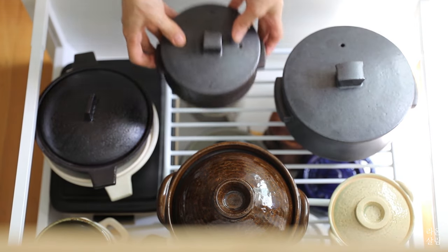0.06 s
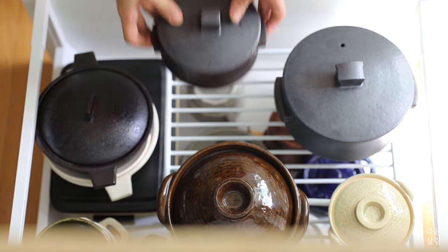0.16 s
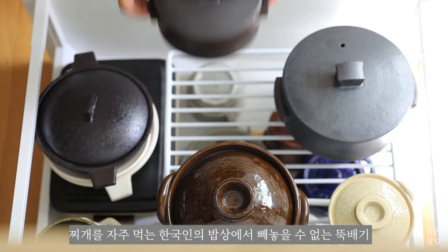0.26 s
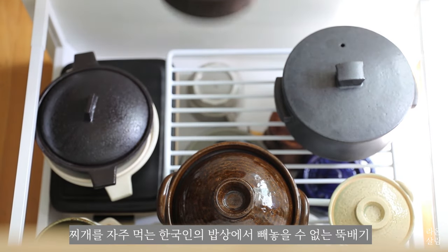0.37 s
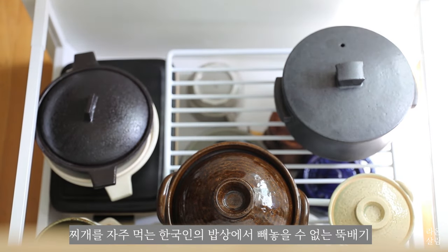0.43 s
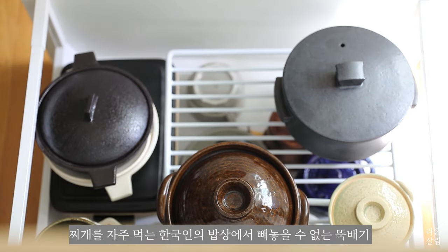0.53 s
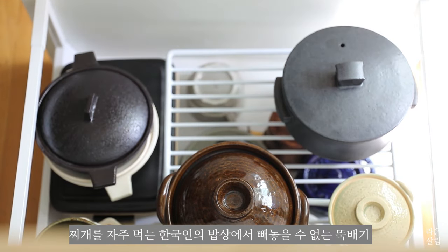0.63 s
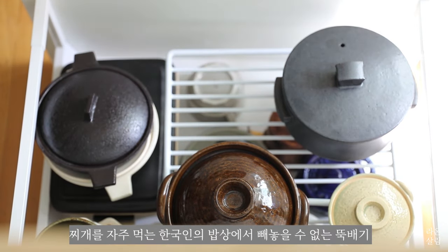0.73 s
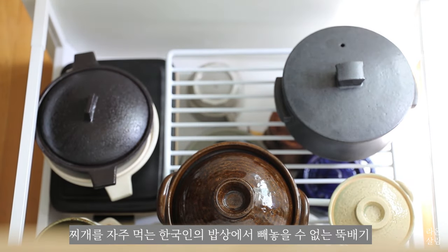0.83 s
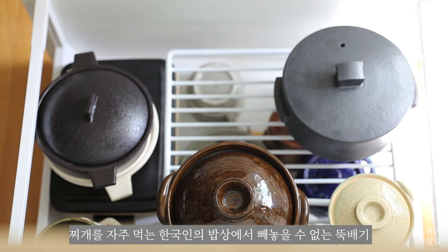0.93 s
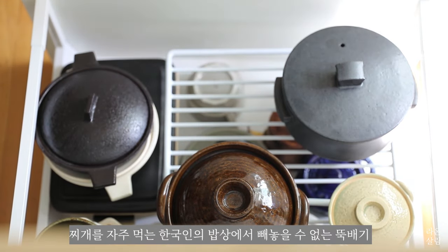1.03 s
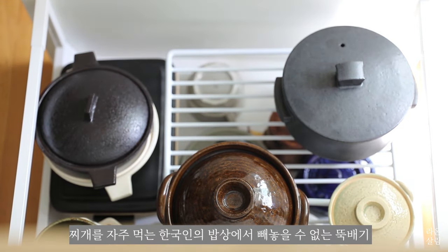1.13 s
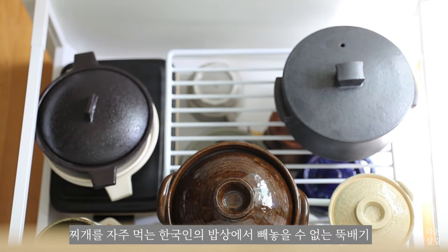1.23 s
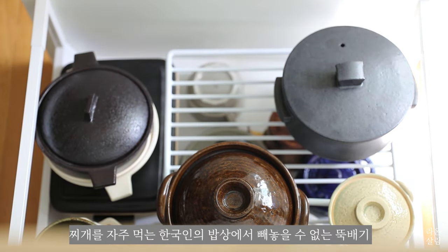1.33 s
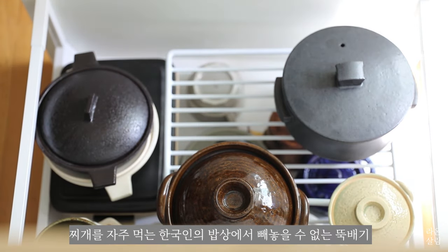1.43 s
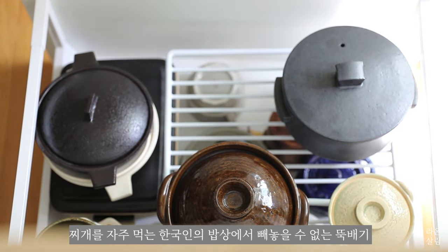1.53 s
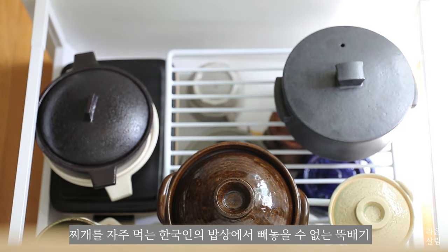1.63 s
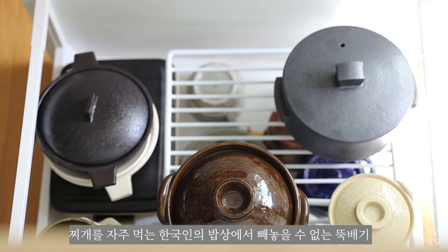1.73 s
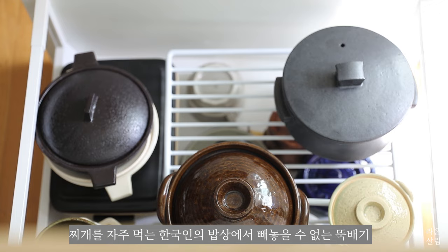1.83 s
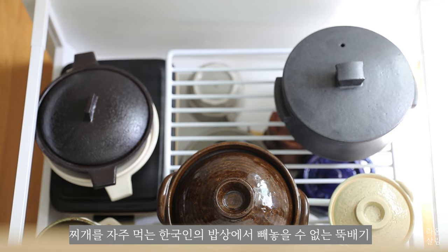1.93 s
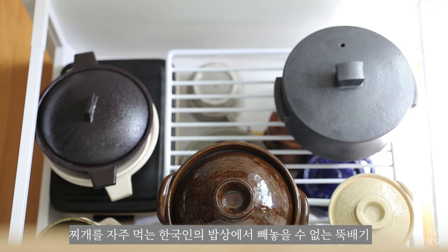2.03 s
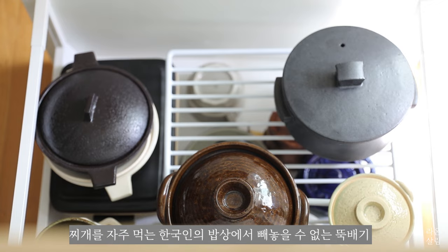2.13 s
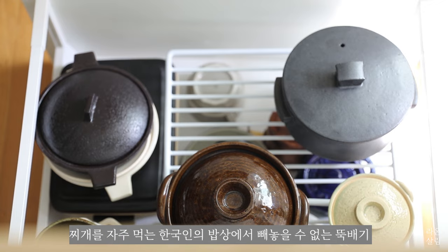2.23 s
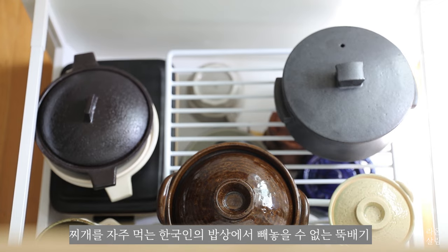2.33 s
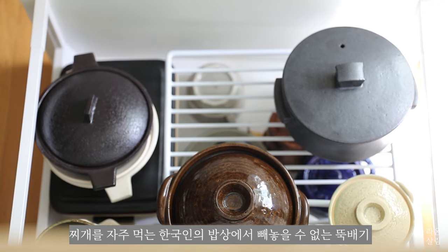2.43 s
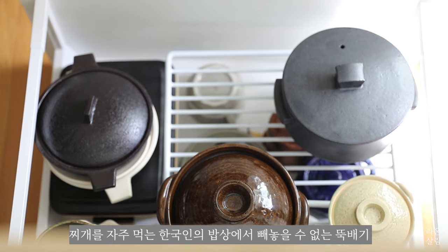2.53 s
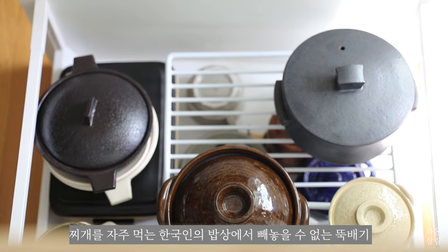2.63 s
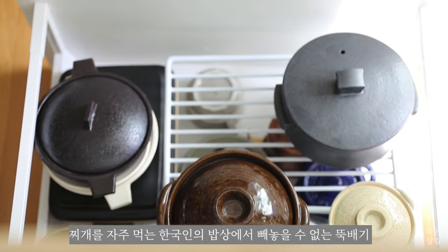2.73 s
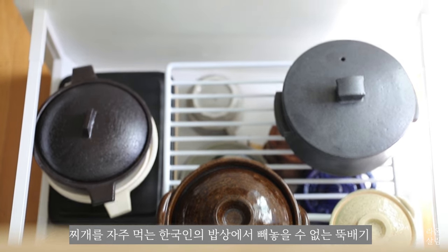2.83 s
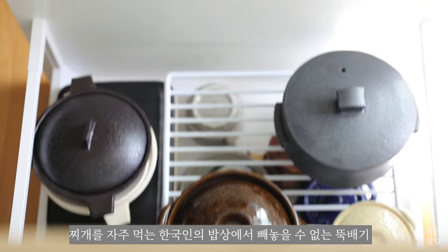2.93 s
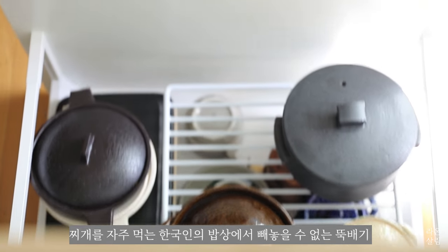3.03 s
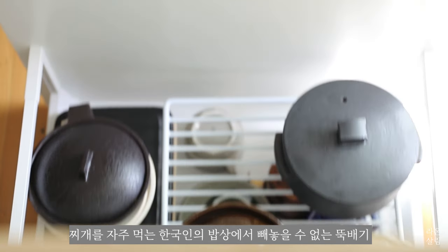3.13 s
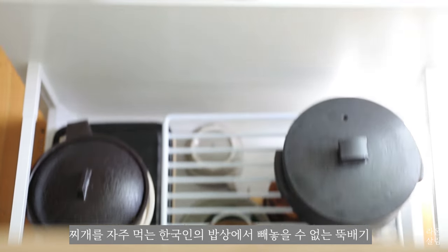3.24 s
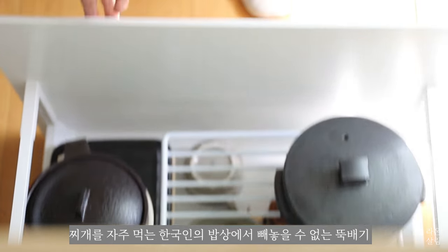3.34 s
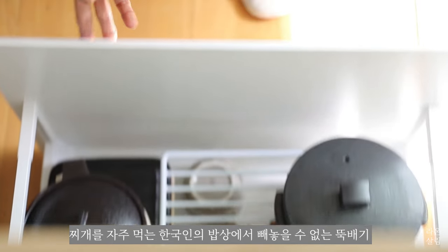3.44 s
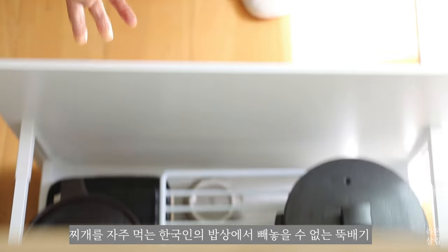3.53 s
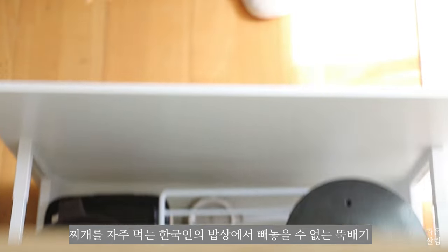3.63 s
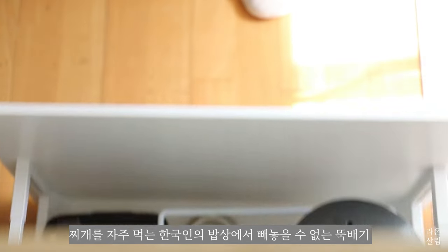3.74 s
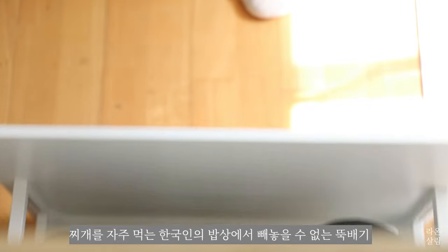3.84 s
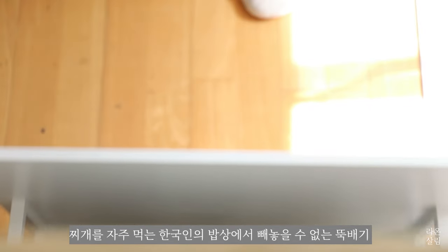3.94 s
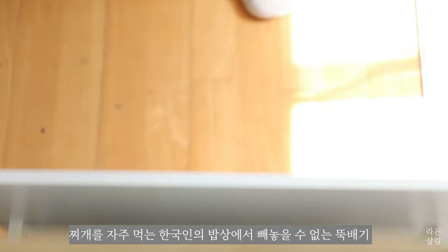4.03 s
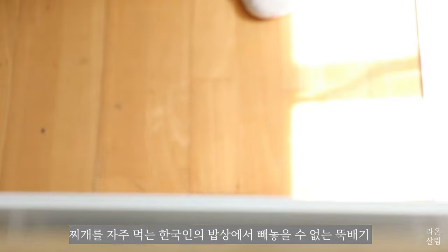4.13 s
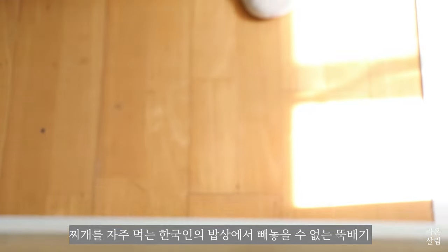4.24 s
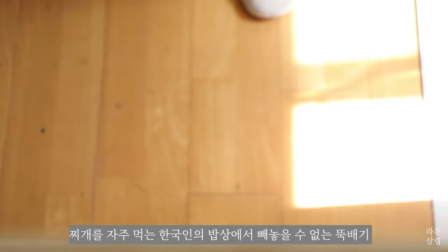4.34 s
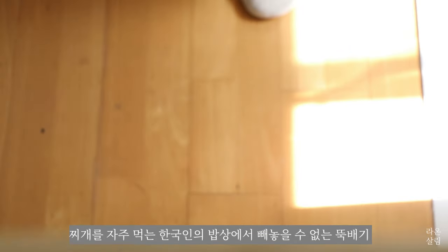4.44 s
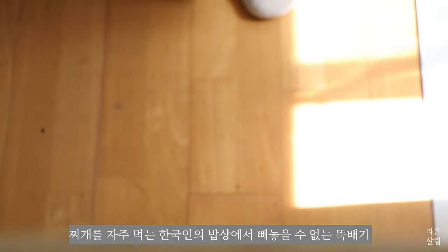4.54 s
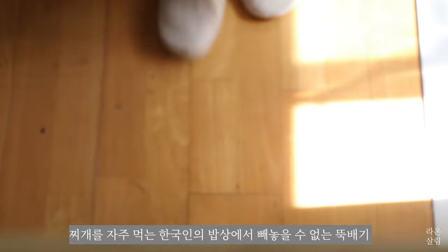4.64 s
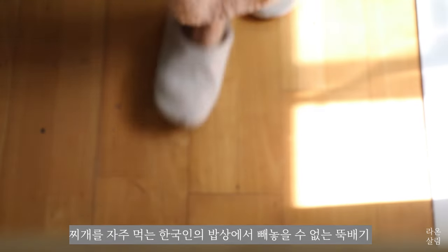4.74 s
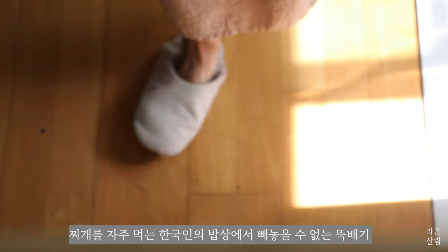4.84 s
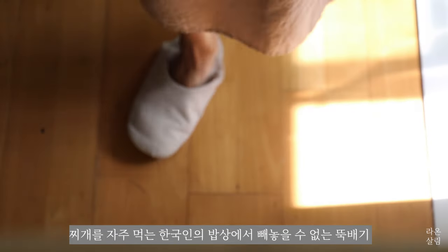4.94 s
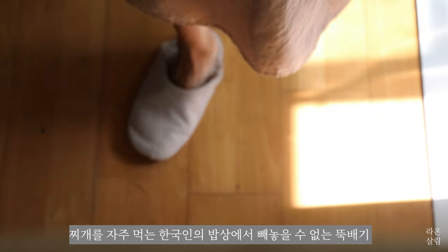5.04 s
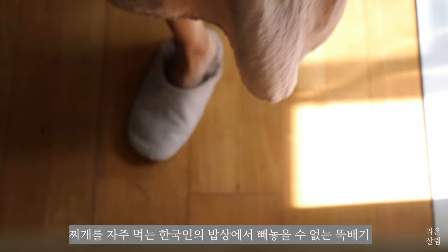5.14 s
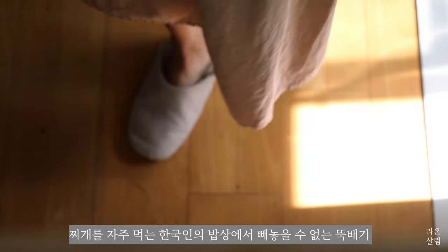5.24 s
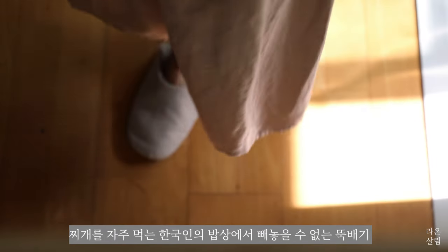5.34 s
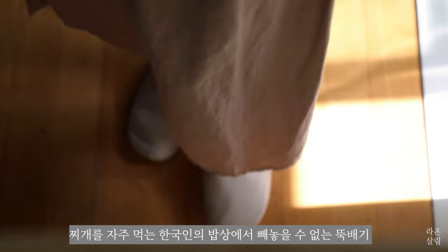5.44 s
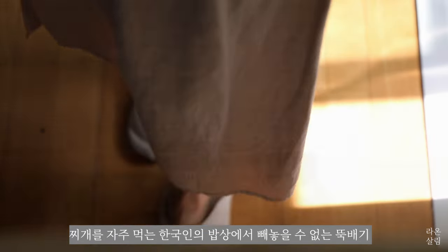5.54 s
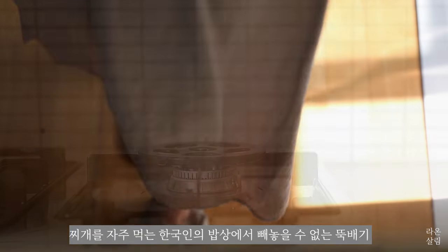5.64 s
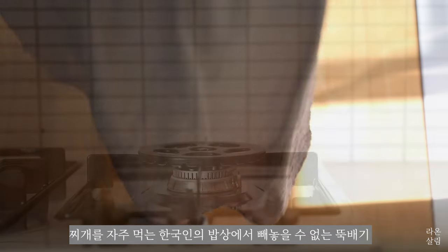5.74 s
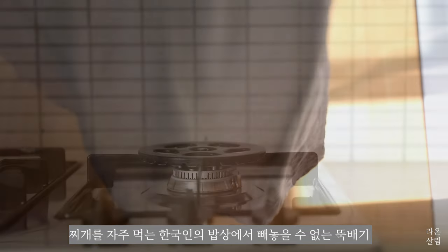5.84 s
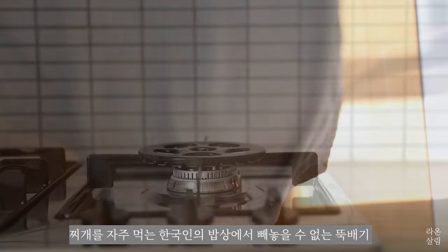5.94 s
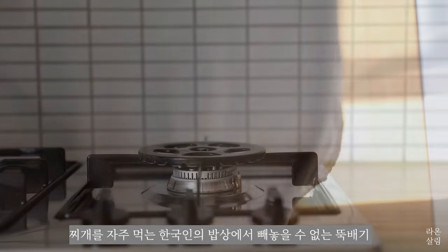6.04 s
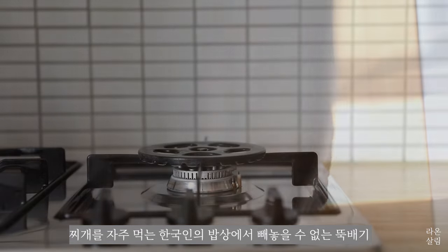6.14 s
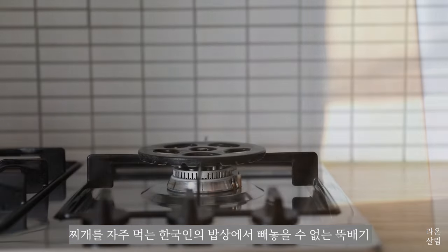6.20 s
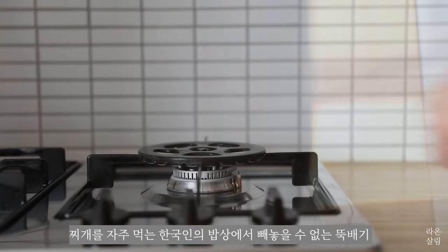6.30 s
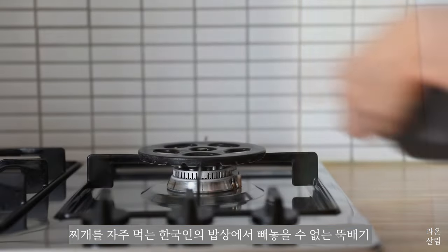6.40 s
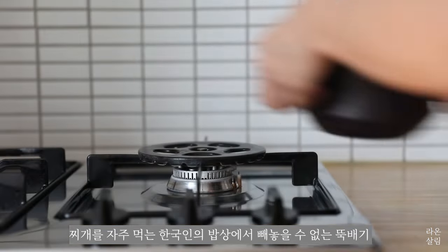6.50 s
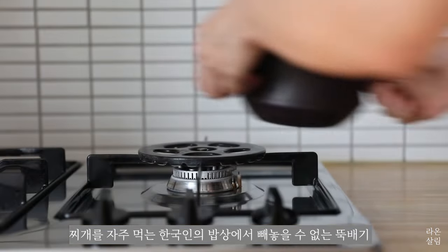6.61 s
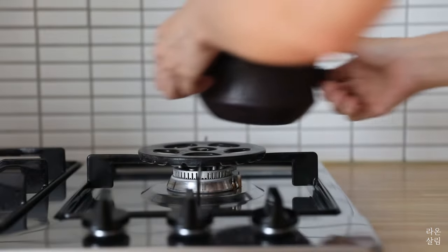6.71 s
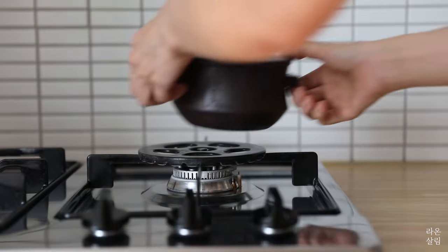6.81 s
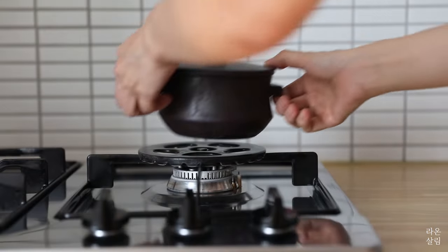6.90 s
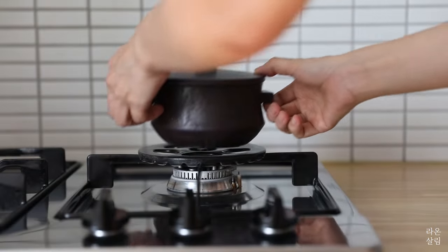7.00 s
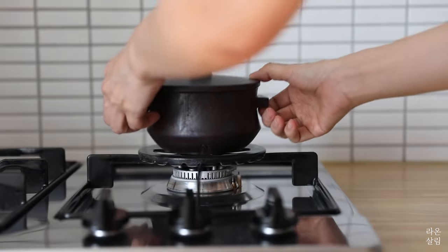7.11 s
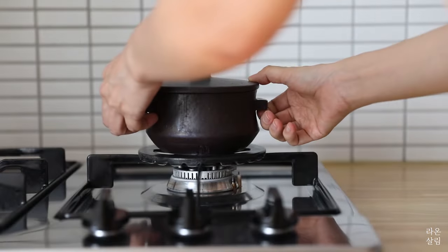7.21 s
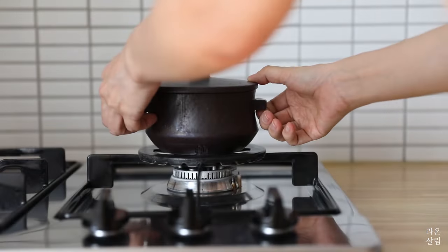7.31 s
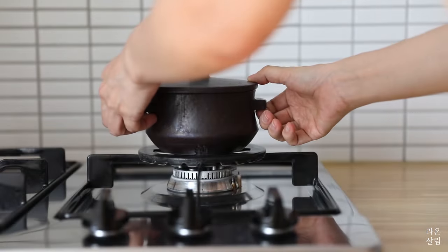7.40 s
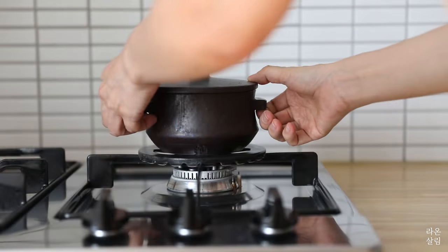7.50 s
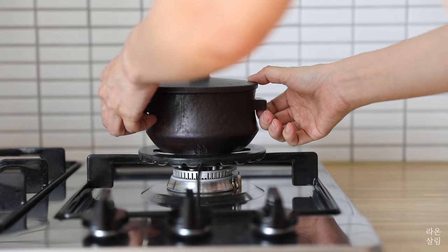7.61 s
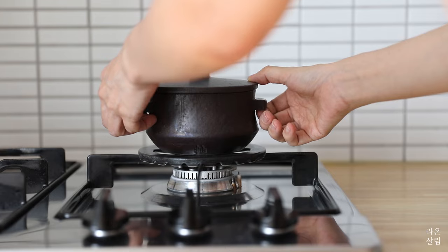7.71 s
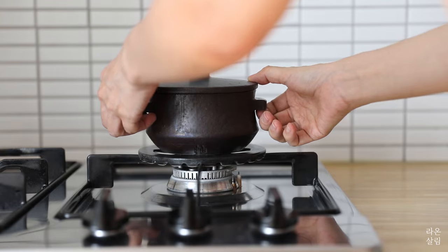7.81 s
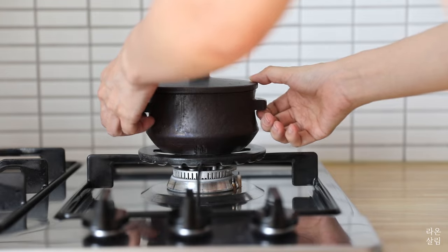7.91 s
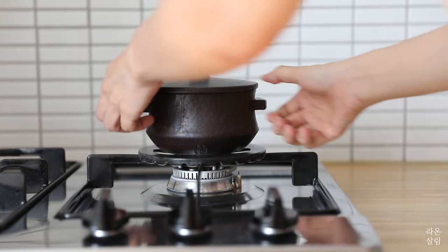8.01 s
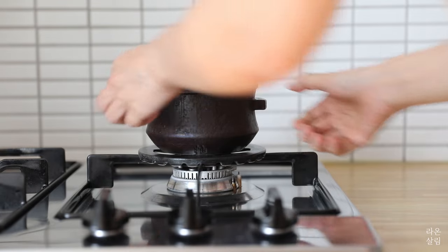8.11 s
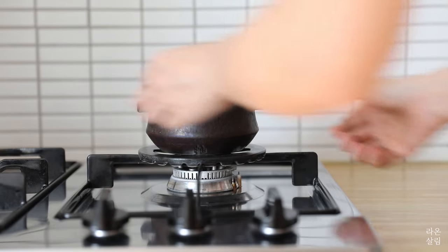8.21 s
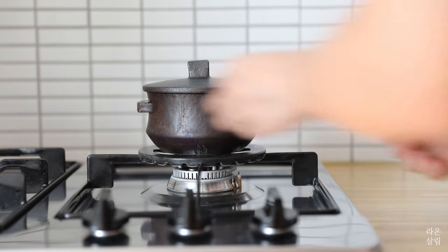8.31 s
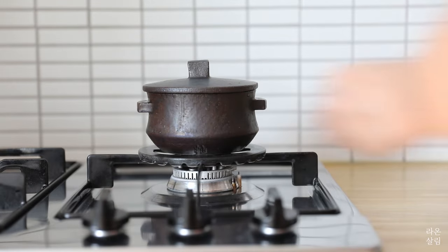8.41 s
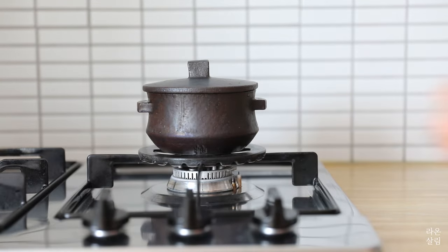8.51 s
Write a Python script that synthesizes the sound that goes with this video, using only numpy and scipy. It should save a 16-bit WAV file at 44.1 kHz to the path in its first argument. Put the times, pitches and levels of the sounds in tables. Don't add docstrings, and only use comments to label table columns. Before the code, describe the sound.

A small hard kitchen with short bright echoes, low room hum and slight hiss, one fixed microphone. Clothes rustle softly from the start; at 1.1 s a clay lid gives one sharp, dry clink. Around 1.5 s a thin wooden panel knocks in a quick flutter, and slippers step at 2.05 and 2.4 s. From 2.9 s a loaded wooden drawer rolls with a low, uneven rumble; pots shift at 3.6 s. Rapid catch knocks and a tiny squeak begin at 4.1 s, leading to a loud slam at 4.75 s with clanking earthenware, another bang at 4.85 s and a deep thud at 4.95 s. Scraping and weakening rocking bumps fade by 5.9 s. A cupboard door knocks lightly at 6.1-6.3 s. At 7.26 s a lidded pot lands hard on an iron grate, bounces until 7.35 s, wobbles and rings briefly. Cloth rustles and a faint bump end it.

```python
import sys
import numpy as np
from scipy import signal
from scipy.fft import rfft, irfft, next_fast_len
from scipy.io import wavfile
from scipy.ndimage import uniform_filter1d

SR = 44100
rng = np.random.default_rng(int(sys.argv[2]) if len(sys.argv) > 2 else 0)


def to_wav(sig):
    pcm = np.clip(np.atleast_2d(sig), -1, 1) * 32767
    pcm = np.round(pcm).astype(np.int16)
    wavfile.write(sys.argv[1], SR, pcm.T)


def to_linear_factor(level_db):
    exponent = np.asarray(level_db, float) / 20
    return 10 ** exponent


N = 377493

# (time [s], rolling level [dB])
ROLL = [(2.85, -60), (2.98, -46.5), (3.26, -42.5), (3.33, -42), (3.45, -40), (3.56, -41.5), (3.76, -44),
        (3.94, -41), (4.08, -40.5), (4.14, -34), (4.29, -44), (4.5, -42.5), (4.68, -44), (5.34, -49.5),
        (5.9, -66), (6.05, -82)]
# (frequency [Hz], width [Hz], level [dB])
DRAWER = [(76.5, 84, -2), (142.7, 72, 4), (247, 90, 0), (361, 66, 4), (474.4, 58, 2.5), (566, 190, -0.5),
          (797, 76, -5)]
# (frequency [Hz], width [Hz], level [dB])
LOAD = [(940, 1120, 18.5), (1560, 1200, -22), (1940, 750, -1), (2680, 530, -2), (3570, 470, 2.5)]
# (time [s], hold [s], rumble [dB], rattle [dB])
JOLTS = [
    (3.616, 0.038, -39, -57),
    (4.764, 0.051, -25.5, -32.5),
    (4.85, 0.023, -46, -32),
    (4.96, 0.03, -33, -56),
    (4.994, 0.0234, -45, -45),
    (5.106, 0.0184, -48, -43),
]
# (time [s], hold [s], level [dB])
SCRAPES = [
    (4.72, .01, -44),
    (5.22, 0.09, -35),
    (6.05, .01, -48),
]
# (time [s], hold [s], level [dB])
BRUSH = [(2.17, 0.03, -55), (5.218, 0.0057, -48), (6.925, 0.008, -53), (4.115, 0.051, -49.5),
         (4.535, 0.01, -48), (4.57, 0.02, -46), (4.7, 0.015, -48), (4.775, 0.015, -42), (4.87, 0.02, -56),
         (5.28, 0.018, -42.5), (8.21, 0.022, -51)]
# (time [s], hold [s], level [dB])
SLAPS = [
    (4.533, .006, -54),
    (4.566, .018, -53),
    (4.688, .016, -50),
    (4.729, .002, -47),
    (4.7605, .016, -41),
    (5.2185, .002, -46),
]

# (time [s], peak level [dB], contact [ms])
LATCH = [(s, db, .45) for s, db in [(4.1, -23.5), (4.125, -21.5), (4.149, -26.5), (4.18, -35), (4.225, -26),
         (4.247, -21), (4.301, -29), (4.33, -25), (4.373, -24), (4.401, -29), (4.434, -28.5), (4.468, -25),
         (4.489, -26.5), (4.529, -26), (4.6, -27), (4.65, -33)]]
# (time [s], peak level [dB], contact [ms])
SHUT = [(4.688, -25.5, 0.52), (4.724, -12.5, 0.2), (4.746, -9, 0.5), (4.7478, -4, 0.21), (4.764, -14, 0.3),
        (4.775, -11.5, 0.18), (4.785, -15, 0.19), (4.81, -22, 0.38), (4.847, -12.5, 0.25),
        (4.862, -11.5, 0.2), (4.885, -13.5, 0.32), (4.905, -19, 0.23), (4.985, -14, 0.22),
        (5.107, -25, 0.25), (5.125, -22.5, 0.16)]
# (time [s], peak level [dB], contact [ms])
THUD = [
    (4.951, -1, 1.3),
    (4.968, -8, 0.95),
    (4.988, -15, 1),
]
# (time [s], peak level [dB], contact [ms])
BOOM = [(4.985, -11, 3.3)]
# (time [s], peak level [dB], contact [ms])
ROCK = [(s, db, .8) for s, db in [(5.069, -19), (5.219, -25), (5.347, -28.5), (5.401, -36), (5.464, -33),
        (5.525, -30), (5.577, -37), (5.631, -32), (5.68, -42), (5.728, -34), (5.78, -36), (5.828, -33),
        (5.89, -38)]]
# (time [s], peak level [dB], contact [ms])
RACK = [(5.22, -30.5, 0.32), (5.347, -31, 0.36), (5.39, -45, .4), (5.463, -36, 0.34), (5.514, -40, .4),
        (5.545, -37.5, .4), (5.575, -40, 0.54), (5.622, -39.5, 0.49), (5.672, -45, .4), (5.712, -47, 0.45),
        (5.75, -46, 0.32), (5.826, -41, 0.46), (5.87, -54, .4)]
# (time [s], peak level [dB], contact [ms])
SQUEAK = [
    (4.112, -39, .03),
    (4.13, -33.5, 0.034),
    (4.15, -38, .03),
    (4.172, -44, .02),
]
# (time [s], peak level [dB], contact [ms])
POTS = [
    (3.725, -53, .11),
    (4.8604, -9, 0.096),
    (4.872, -19.5, 0.087),
    (4.912, -20, 0.095),
]
# (time [s], peak level [dB], contact [ms])
NUDGE = [
    (4.114, -29.5, 0.055),
    (4.241, -35, .05),
    (4.7655, -15, 0.16),
    (4.7997, -26, 0.097),
    (4.9144, -29, 0.12),
    (5.0191, -36, 0.12),
]
# (time [s], peak level [dB], contact [ms])
JUG = [
    (3.6114, -34.5, 0.23),
    (4.78, -13, 0.22),
    (4.847, -17.5, 0.25),
    (4.9911, -14, 0.19),
    (5.005, -19.5, 0.23),
    (5.244, -29.5, 0.34),
]
# (time [s], peak level [dB], contact [ms])
BOWL = [
    (4.729, -20.5, 0.11),
    (4.8, -23.5, .12),
]
# (time [s], peak level [dB], contact [ms])
CUP = [(6.413, -43.5, 0.13)]
# (time [s], peak level [dB], contact [ms])
CHINK = [(4.996, -40, 0.025)]
# (time [s], peak level [dB], contact [ms])
GRATE = [
    (7.2612, -2.5, 0.016),
    (7.2642, 0, 0.012),
    (7.2795, -10, 0.022),
    (7.2855, -2, 0.04),
    (7.344, -18, .04),
    (7.349, -5.5, 0.052),
]
# (time [s], peak level [dB], contact [ms])
BARS = [
    (7.2635, -15, 0.011),
    (7.281, -21, .015),
    (7.3465, -20, 0.015),
]
# (time [s], peak level [dB], contact [ms])
WOBBLE = [
    (7.297, -15.5, 0.055),
    (7.358, -16, 0.099),
    (7.388, -21, 0.079),
    (7.418, -18.5, 0.3),
    (7.44, -20, 0.36),
    (7.468, -22, 0.42),
]
# (time [s], peak level [dB], contact [ms])
STOVE = [
    (7.264, -17, 1.0),
    (7.346, -17.5, 1.4),
    (7.42, -27, 1.5),
    (8.43, -40.5, 7.1),
]
# (time [s], peak level [dB], contact [ms])
LID = [
    (.978, -38, .05),
    (1.0748, -15, 0.045),
    (1.0782, -21, .15),
]
# (time [s], peak level [dB], contact [ms])
PANEL = [
    (1.457, -26, 0.12),
    (1.4685, -26, 0.1),
    (1.476, -24, 0.12),
    (1.499, -29, 0.2),
    (1.513, -31, .8),
    (1.527, -29, 1),
    (1.546, -34, 1.2),
]
# (time [s], peak level [dB], contact [ms])
DOOR = [(s, db, .45) for s, db in [(6.073, -24), (6.101, -28), (6.184, -32), (6.301, -36.5), (6.329, -37)]]
# (time [s], peak level [dB], contact [ms])
STEPS = [
    (1.995, -36, 0.5),
    (2.039, -27, 0.187),
    (2.0645, -21, 0.3),
    (2.084, -29.5, 0.52),
    (2.104, -33, 0.25),
]
# (time [s], peak level [dB], contact [ms])
HEEL = [
    (2.342, -34.5, 0.72),
    (2.3865, -20, .3),
    (2.404, -27, 0.35),
]
# (time [s], peak level [dB], contact [ms])
TICKS = [(s, db, .045) for s, db in [(4.0966, -39), (4.2392, -39), (5.2183, -31.5), (5.295, -28),
         (5.548, -43), (6.929, -40)]]
# (time [s], peak level [dB], contact [ms])
RUBS = [(s, db, .07) for s, db in [(4.1111, -31), (4.76, -24), (6.0843, -39.5)]]
# (time [s], peak level [dB], contact [ms])
SNAPS = [
    (1.0748, -45, 0.041),
    (1.4555, -39.5, .04),
    (1.994, -36.5, .04),
    (2.0385, -34, .04),
    (2.062, -31, .04),
    (2.3405, -38, .04),
    (2.3845, -31.5, .04),
    (4.148, -38, .08),
    (4.586, -32, .06),
    (4.688, -36, .05),
]
# (time [s], peak level [dB], contact [ms])
TAPS = [
    (5.4265, -39.5, 0.1),
    (5.513, -44, 0.087),
    (5.527, -38.5, 0.055),
    (5.6518, -34, .05),
    (5.664, -34, 0.073),
    (5.829, -39, 0.041),
    (6.413, -43, 0.13),
]

# (frequency [Hz], level [dB], t60 [s])
SHUT_MODES = [(156, -28, 0.26), (205, 1.5, 0.16), (265, -12, 0.11), (369, 11.5, 0.034), (453, 1, 0.18),
              (604, -1.5, 0.051), (656, 13.5, 0.052), (742, 14.5, 0.12), (817, 11, 0.079),
              (1030, -26, 0.099), (1464, 4, 0.035)]
# (frequency [Hz], level [dB], t60 [s])
THUD_MODES = [(50, -14, 0.55), (63.4, 4.5, 0.38), (126.4, -4, 0.28), (145, 13, 0.14), (200, 9.5, 0.076),
              (245, -6, 0.055)]
# (frequency [Hz], level [dB], t60 [s])
BOOM_MODES = [(64, 4, 0.4), (74.5, -6, .6)]
# (frequency [Hz], level [dB], t60 [s])
ROCK_MODES = [(72, -5, .2), (149.7, 6.5, 0.079), (253.5, -11, 0.063)]
# (frequency [Hz], level [dB], t60 [s])
RACK_MODES = [(454.6, -3, 0.28), (900, -10, .05)]
# (frequency [Hz], level [dB], t60 [s])
SQUEAK_MODES = [(2500, -1, .02), (3000, -5, .02), (3480, -2, .02), (3720, 1, 0.027), (3980, -1, .025),
                (4200, -4, .02), (5230, -1, 0.06), (5340, -13, .03)]
# (frequency [Hz], level [dB], t60 [s])
POT_MODES = [(911, -4, 0.042), (1955, -10.5, 0.05), (3038, 3, 0.03), (3393, -5, 0.024), (2650, -6, 0.032),
             (4260, -20, 0.032), (5340, -18, 0.027), (6700, -16, 0.027)]
# (frequency [Hz], level [dB], t60 [s])
JUG_MODES = [(920, 1, 0.069), (1004, -2, 0.035), (1360, -5, 0.057), (1973, -3, 0.036), (2890, -9, .03),
             (4430, -18, .03)]
# (frequency [Hz], level [dB], t60 [s])
BOWL_MODES = [(1030, -6, .03), (2655, 3.5, 0.027), (3170, -5, 0.027), (3800, -10, .03)]
# (frequency [Hz], level [dB], t60 [s])
CUP_MODES = [(1037, 0, 0.04), (1720, -2, 0.045)]
# (frequency [Hz], level [dB], t60 [s])
CHINK_MODES = [(3940, 0.5, 0.95), (5425, 4, 0.099), (6250, -2, .05), (6980, 0, 0.05), (10780, -10, .03)]
# (frequency [Hz], level [dB], t60 [s])
GRATE_MODES = [(409, -29, 0.43), (612, -23, .2), (700, -2, 0.06), (880, 1, 0.08), (1258, -13, 0.18),
               (1400, -6, 0.046), (1970, -28, 0.14), (2780, -6.5, .08), (2950, -19, 0.16), (3530, -5, 0.12),
               (3670, -6, 0.196), (3712, 0, 0.13), (4370, -20.5, 0.098), (4950, -16, 0.155)]
# (frequency [Hz], level [dB], t60 [s])
BAR_MODES = [(5450, -14, 0.207), (5810, -16, 0.172), (6100, -3.5, 0.067), (6200, 1, 0.041),
             (7410, -1, 0.08), (8460, 1.5, 0.038), (9440, -17, .05), (10400, -11, 0.05), (11330, -15, .11),
             (13250, -33.5, .12), (14750, -19, .12)]
# (frequency [Hz], level [dB], t60 [s])
LONG_BAR_MODES = [(2616, -3, .3), (3020, -2, .27), (3560, -3, .4), (3640, -4, 0.33), (3750, -6, .42),
                  (3830, -6, .3), (5780, -5, .3), (7375, -12, 0.36), (7440, -14, .3), (8460, -7.5, 0.36),
                  (10250, -9, 0.17), (11210, -13, 0.12), (13100, -17, .12), (14400, -16, .1)]
# (frequency [Hz], level [dB], t60 [s])
STOVE_MODES = [(90.8, 1, 0.48), (128, 3, 0.51), (158.7, -5.5, 0.45), (219.5, 4.5, 0.307),
               (282.6, 2.5, 0.48)]
# (frequency [Hz], level [dB], t60 [s])
LID_MODES = [(656, -13.5, 0.04), (812, -2, 0.05), (880, 2, 0.035), (1100, -13, .02), (905, -11, .2),
             (1480, -12, 0.012), (2030, -13, 0.08), (2998, -4, .018), (3740, -7, .015), (4250, -11, .012)]
# (frequency [Hz], level [dB], t60 [s])
PANEL_MODES = [(154, -19, .1), (257, 1.5, 0.2), (286.3, 5, 0.2), (330, -5, 0.12), (650, -9, .05),
               (950, -5, .05), (1130, -1, .07), (1500, -4, .045), (2000, -8, .04), (2800, -9, .04)]
# (frequency [Hz], level [dB], t60 [s])
DOOR_MODES = [(303, 13, 0.15), (318, -4, 0.14), (354, 1, 0.1), (990, -26, .05)]
# (frequency [Hz], level [dB], t60 [s])
STEP_MODES = [(160, -1, .08), (244, -6, 0.055), (314, -5, 0.061), (413, -5, .07), (590, -7, 0.044),
              (756, -12, .04), (1800, -12, .02)]
# (frequency [Hz], level [dB], t60 [s])
HEEL_MODES = [(153, -6, 0.12), (270, -3, 0.13), (506, -4.5, .08), (842, -1.5, 0.066), (1310, -7, .03),
              (1780, -22, .02)]
# (frequency [Hz], level [dB], t60 [s])
TICK_MODES = [(2110, -10, 0.0096), (3760, 25, 0.0074), (4960, -25, 0.0081), (7500, -31, .01),
              (11000, -17, .01)]
# (frequency [Hz], level [dB], t60 [s])
TAP_MODES = [(1370, -4, .025), (2070, -4, 0.018), (3600, -4, 0.013)]

# (frequency [Hz], level [dB per Hz])
SHUT_CLATTER = [(35, -58), (105, -25), (157, 3), (582, -2.5), (729, -8.5), (825, -55), (1050, -12.5),
                (8000, -48), (10400, -49), (17600, -120)]
# (frequency [Hz], level [dB per Hz])
LOW_CLATTER = [(24, -38), (40, -24), (182, 8), (484, -33), (979, -14), (3000, -40), (3900, -76.5)]
# (frequency [Hz], level [dB per Hz])
POT_CLATTER = [(470, -21), (800, 0.5), (1740, -15), (2010, -8.5), (2290, -22), (3210, -17.5), (4710, -25),
               (9000, -57)]
# (frequency [Hz], level [dB per Hz])
GRATE_CLATTER = [(76, -40), (130, 2), (210, 1), (400, -13), (712, -2), (1060, -4), (2510, -6), (3750, -6.5),
                 (6690, -17), (8680, -17), (15500, -39.5)]
# (frequency [Hz], level [dB per Hz])
WOBBLE_CLATTER = [(76, -30), (130, -2), (400, 4.5), (1400, -8), (2800, -6.5), (3750, -15), (5800, -24),
                  (8000, -40)]
# (frequency [Hz], level [dB per Hz])
LID_CLATTER = [(300, -40), (500, -14), (850, 0), (1250, -10), (1500, -17), (2930, -21), (4200, -26),
               (5000, -50)]
# (frequency [Hz], level [dB per Hz])
PANEL_CLATTER = [(88, -39), (150, -22), (305, -7.5), (660, -18), (1100, -13), (2380, -33.5), (6000, -48),
                 (7800, -80)]
# (frequency [Hz], level [dB per Hz])
DOOR_CLATTER = [(88, -57), (150, -38), (307, -2), (597, -22), (753, -23), (3780, -31), (8000, -51.5),
                (10400, -81)]
# (frequency [Hz], level [dB per Hz])
STEP_CLATTER = [(88, -34), (150, -8.5), (588, -3), (1580, -19.5), (2950, -22), (3640, -20), (4930, -35),
                (14000, -41.5)]
# (frequency [Hz], level [dB per Hz])
HEEL_CLATTER = [(120, -33), (264, -0.5), (870, -9.5), (1800, -15), (2600, -27.5), (3700, -24.5),
                (6000, -39), (12000, -60)]
# (frequency [Hz], level [dB per Hz])
TICK_CLATTER = [(710, -24), (1200, -4.5), (2310, -9), (3490, -9), (3760, -5), (4000, -11.5), (15000, -32)]

# (time [s], hold [s], level [dB])
RUSTLE = [(.3, 0.75, -49), (1.4, 0.35, -55.5), (2.14, 0.045, -47), (3.2, 0.85, -68), (3.38, 0.2, -48),
          (4.1, 0.12, -54), (4.3, .2, -50.5), (4.78, 0.05, -51), (5.0, 0.14, -46), (5.62, 0.16, -47),
          (6.0, 0.24, -48.5), (6.6, 0.29, -51), (7.45, 0.156, -61.5), (8.35, .3, -47)]
# (frequency [Hz], width [Hz], level [dB])
CLOTH = [(2000, 2600, 15), (3450, 1150, 13.5)]
# (frequency [Hz], t60 [s])
ROOM = [(125, 0.78), (500, 0.44), (2000, 0.36), (8000, 0.26)]
# (frequency [Hz], level [dB per Hz])
AIR = [(20, -57), (48, -12), (68, -2), (120, -3.5), (154, -6), (210, -6.5), (357, -1.5), (434, -8),
       (558, -6.5), (759, -12), (2670, -26.5), (3840, -25.5), (4940, -30.5), (16000, -30)]


def set_rms(x, db):
    return x * to_linear_factor(db) / np.sqrt(np.mean(x ** 2))


def peak(x):
    return x / np.abs(x).max()


def colour(x, points):
    hz, db = np.transpose(points)
    size = next_fast_len(len(x))
    f = np.fft.rfftfreq(size, 1 / SR) + 1
    gain = to_linear_factor(np.interp(np.log(f), np.log(hz), db))
    return irfft(rfft(x, size) * gain, size)[:len(x)]


def resonate(x, peaks):
    out = 0
    for hz, width, db in peaks:
        b, a = signal.iirpeak(hz, hz / width, SR)
        out = out + to_linear_factor(db) * signal.lfilter(b, a, signal.lfilter(b, a, x))
    return out


def curve(rows):
    s, db = np.transpose(rows)
    return to_linear_factor(np.interp(np.arange(N) / SR, s, db, left=-150, right=-150))


def swells(rows, rise_db_s, fall_db_s):
    t = np.arange(0, N + 32, 32) / SR
    gain = 0
    for s, hold, db in rows:
        rise = rise_db_s * np.clip(s - t, 0, 9)
        fall = fall_db_s * np.clip(t - s - hold, 0, 9)
        gain = gain + to_linear_factor(db - rise - fall)
    return np.interp(np.arange(N) / SR, t, gain)


def walk(rate):
    k = int(SR / rate)
    held = np.repeat(rng.standard_normal(N // k + 1), k)
    return 2.0 * uniform_filter1d(uniform_filter1d(held, k), k)[:N]


def grit(size, rate, spread_db, dice=rng):
    hit = dice.random(size) < rate / SR
    return hit * dice.standard_normal(size) * to_linear_factor(spread_db * dice.exponential(size=size))


def knock(events, modes, clatter, chatter_ms, clatter_db, clatter_t60, room_db):
    out, t = np.zeros(N + SR), np.arange(SR // 2) / SR
    hz, db, t60 = (c[:, None] for c in np.transpose(modes))
    t = t[t < .19 + .6 * max(t60.max(), clatter_t60)]
    fade = 1000. ** (-t / t60)
    floor = signal.butter(3, 0.67 * hz.min(), "high", fs=SR, output="sos")
    dice = rng.spawn(1)[0]
    spots = dice.standard_normal((len(events), len(modes), 2))
    chatter = grit((len(events), 8192), 3000, 2.07, dice)
    noises = dice.standard_normal((len(events), len(t)))
    for (s, peak_db, contact_ms), spot, push, noise in zip(events, spots, chatter, noises):
        age = t[:8192] * 1000 / max(chatter_ms, .1)
        push = (push * np.exp(-age))[age < 6]
        push[0] += 1.8
        cycles = hz * (1 + .004 * spot[:, 1:]) * t
        turns = np.exp(-2j * np.pi * cycles[:, np.flatnonzero(push)])
        share = np.abs(turns @ push[push != 0])[:, None]
        ring = to_linear_factor(db + 2 * spot[:, :1]) / share * np.sin(np.float32(2 * np.pi * cycles)) * fade
        keep = np.exp(-1000 / SR / max(contact_ms / 2, .005))
        ring = signal.lfilter([1], [1, -2 * keep, keep ** 2], ring.sum(0))
        burst = colour(noise, clatter) * 1000. ** (-t / clatter_t60) * np.clip(t / 0.00087, 0, 1)
        blow = peak(signal.fftconvolve(push, ring))
        blow = blow + to_linear_factor(clatter_db) * peak(signal.fftconvolve(push, burst))
        at = int(s * SR)
        out[at:at + len(t)] += to_linear_factor(peak_db) * peak(signal.sosfilt(floor, blow[:len(t)]))
    return np.array([out[:N], to_linear_factor(room_db) * out[:N]])


def drawer():
    rumble = resonate(grit(N, 2500, 2.87) * to_linear_factor(1.87 * walk(24.655)), DRAWER)
    rattle = resonate(grit(N, 4000, 1.4) * to_linear_factor(0.23 * walk(30.1)), LOAD)
    scrape = grit(N, 8000, 1.8) * to_linear_factor(5.1 * walk(40))
    scrape = colour(scrape, [(3000, -25), (4500, -27), (8000, 5), (15000, -7)])
    push = curve(ROLL)
    hidden = to_linear_factor(-9.5 * np.clip(np.arange(N) / SR - 3.73, 0, 9))
    jolts = np.array(JOLTS)
    drum = swells(jolts[:, [0, 1, 2]], rise_db_s=180, fall_db_s=125)
    shake = swells(jolts[:, [0, 1, 3]], rise_db_s=180, fall_db_s=125)
    rolling = set_rms(rumble, -0.58) * (push + drum)
    rattling = set_rms(rattle, -5.0) * (to_linear_factor(-1.5) * push * hidden + shake)
    scraping = set_rms(scrape, -23) * swells(SCRAPES, rise_db_s=180, fall_db_s=125)
    return rolling + rattling + scraping


def brush():
    grain = grit(N, 9000, 1.3)
    grain = colour(grain, [(400, 5), (1500, 0.5), (3700, -0.5), (4700, -9.5), (9000, -13.5), (15000, -18.5)])
    puff = colour(np.roll(grain, SR), [(3000, -12), (5000, -0.5), (9000, 0.5), (13000, 2), (16000, -4)])
    strokes = set_rms(grain, 0) * swells(BRUSH, rise_db_s=503, fall_db_s=269)
    return strokes + set_rms(puff, 0) * swells(SLAPS, rise_db_s=6000, fall_db_s=600)


def drawer_bangs():
    return (knock(LATCH, SHUT_MODES, SHUT_CLATTER, 2.8, 4.2, 0.17, -7)
            + knock(SHUT, SHUT_MODES, SHUT_CLATTER, 5.9, -9, 0.11, -14)
            + knock(THUD, THUD_MODES, LOW_CLATTER, 2.9, -14, 0.24, -19.5)
            + knock(BOOM, BOOM_MODES, LOW_CLATTER, 2, -25, .1, -20)
            + knock(ROCK, ROCK_MODES, LOW_CLATTER, 7.9, -14, 0.1, -5)
            + knock(RACK, RACK_MODES, DOOR_CLATTER, 2.2, -20, .05, -8.5)
            + knock(SQUEAK, SQUEAK_MODES, TICK_CLATTER, 19.8, -14, .03, -1.7))


def pots_in_drawer():
    return (knock(POTS, POT_MODES, POT_CLATTER, 7.5, -8, 0.13, -11.5)
            + knock(NUDGE, JUG_MODES, POT_CLATTER, 3.2, 3.3, 0.084, -5.5)
            + knock(JUG, JUG_MODES, POT_CLATTER, 5.5, -7, .1, -4)
            + knock(BOWL, BOWL_MODES, POT_CLATTER, 3, -9.5, .08, -8.5)
            + knock(CUP, CUP_MODES, POT_CLATTER, 9, -15, .03, -6)
            + knock(CHINK, CHINK_MODES, TICK_CLATTER, 18, -6, .03, -1))


def pot_on_grate():
    return (knock(GRATE, GRATE_MODES + BAR_MODES, GRATE_CLATTER, 2.18, 0.73, 0.068, -8.5)
            + knock(BARS, LONG_BAR_MODES, TICK_CLATTER, 2.5, -20, .02, -6.5)
            + knock(WOBBLE, GRATE_MODES, WOBBLE_CLATTER, 27, 10, 0.034, -5.5)
            + knock(STOVE, STOVE_MODES, LOW_CLATTER, 12, -21.5, 0.23, -9))


def clay_lid():
    return knock(LID, LID_MODES, LID_CLATTER, 0.11, -13, 0.2, -17)


def cupboard():
    return (knock(PANEL, PANEL_MODES, PANEL_CLATTER, 4, -7, 0.088, -13.5)
            + knock(DOOR, DOOR_MODES, DOOR_CLATTER, 3.4, -10, 0.16, -17.5))


def slippers():
    return (knock(STEPS, STEP_MODES, STEP_CLATTER, 2.7, 3, 0.081, -9)
            + knock(HEEL, HEEL_MODES, HEEL_CLATTER, 4.2, -0.66, 0.054, -9))


def small_contacts():
    return (knock(TICKS, TICK_MODES, TICK_CLATTER, 16.5, 1.4, 0.013, -14.5)
            + knock(RUBS, TICK_MODES, TICK_CLATTER, 12.6, 7.7, 0.032, -13)
            + knock(SNAPS, TICK_MODES, TICK_CLATTER, 2.2, 6.3, 0.011, -31)
            + knock(TAPS, TAP_MODES, TICK_CLATTER, 1.2, -6.5, .015, -8.5))


def clothes():
    rub = resonate(grit(N, 12000, 0.47) * to_linear_factor(1.6 * walk(20)), CLOTH)
    return set_rms(rub, -9.0) * swells(RUSTLE, rise_db_s=56, fall_db_s=81)


def room(x):
    t, tail = np.arange(SR) / SR, 0
    room_hz, room_t60 = np.transpose(ROOM)
    for hz in 50 * 2. ** np.arange(9):
        t60 = np.interp(np.log(hz), np.log(room_hz), room_t60)
        octave = signal.butter(2, [hz / 1.41, hz * 1.41], "band", fs=SR, output="sos")
        tail = tail + signal.sosfilt(octave, rng.standard_normal(SR)) * 1000. ** (-t / t60)
    tail = tail * np.clip(t / 0.0028, 0, 1)
    return signal.fftconvolve(x, tail / np.sqrt(np.sum(tail ** 2)))[:N]


def air():
    hum = colour(rng.standard_normal(N), AIR)
    low = signal.sosfilt(signal.butter(2, 700, fs=SR, output="sos"), hum)
    return set_rms(hum + low * (to_linear_factor(1.18 * walk(1.808)) - 1), -49.5)


def scene():
    rolling = drawer() + brush()
    blows = drawer_bangs() + pots_in_drawer() + pot_on_grate()
    blows = blows + clay_lid() + cupboard() + slippers() + small_contacts()
    direct = rolling + clothes() + blows[0]
    to_room = to_linear_factor(-5.0) * rolling + blows[1]
    bass_cut = signal.butter(4, 50, "high", fs=SR, output="sos")
    mid = signal.sosfilt(bass_cut, direct + room(to_room)) + air()
    hiss = colour(rng.standard_normal(N), [(100, -5), (2000, -6.5), (8000, -5.0), (14000, -6.0)])
    side = set_rms(hiss, -61.5) + 0.00097 * np.roll(mid, 40)
    return np.array([mid + side, mid - side])


def roll_off(x):
    return signal.sosfilt(signal.butter(12, 16650, fs=SR, output="sos"), x)


def record(dry):
    rounded = np.tanh(0.54 * dry) / 0.59
    top = signal.ellip(8, .2, 60, 15780, fs=SR, output="sos")
    mix = signal.sosfilt(top, rounded)
    return roll_off(mix)


dry = scene()
out = record(dry)
to_wav(out)
```